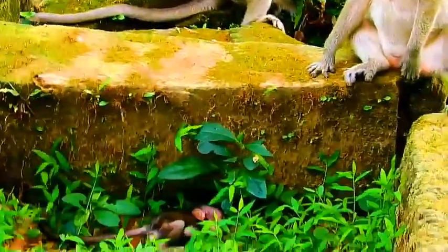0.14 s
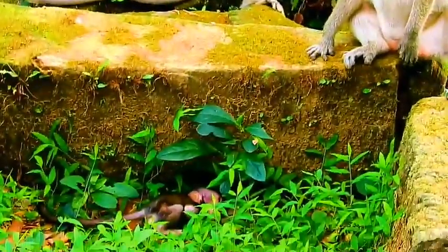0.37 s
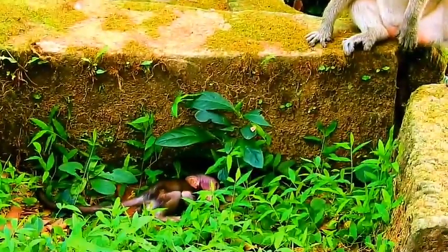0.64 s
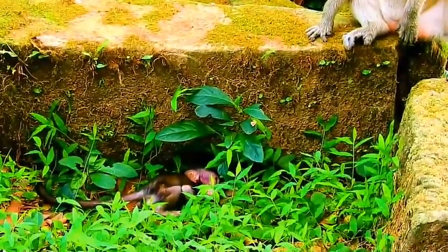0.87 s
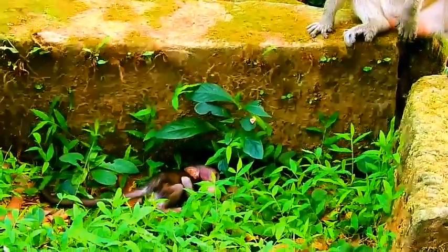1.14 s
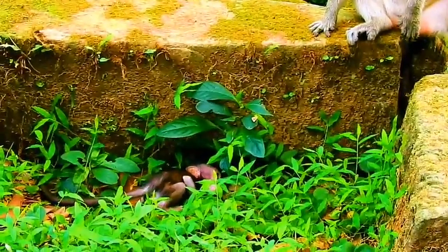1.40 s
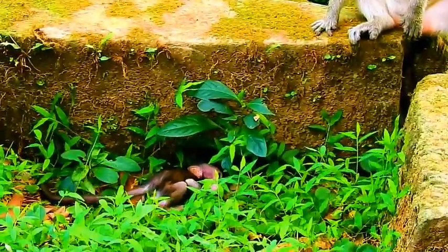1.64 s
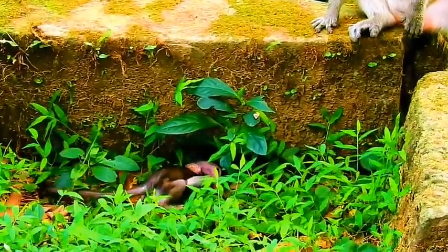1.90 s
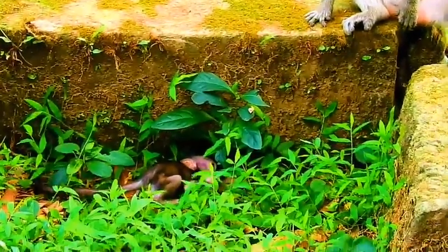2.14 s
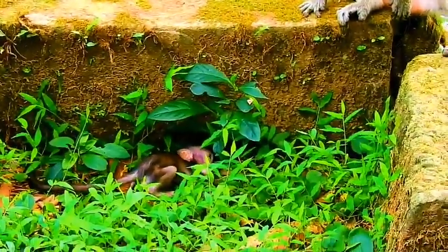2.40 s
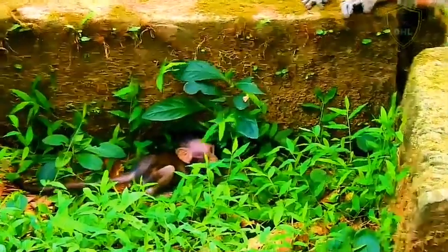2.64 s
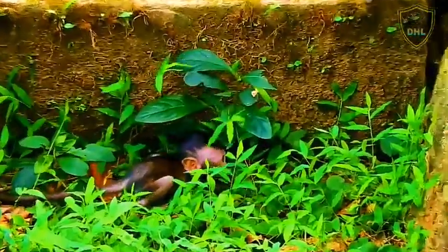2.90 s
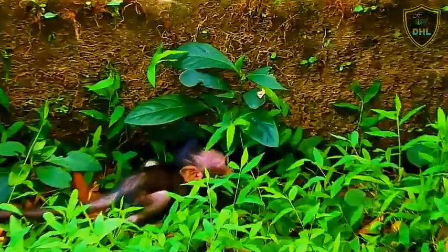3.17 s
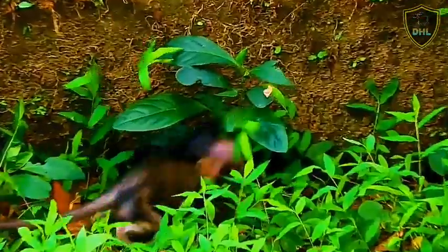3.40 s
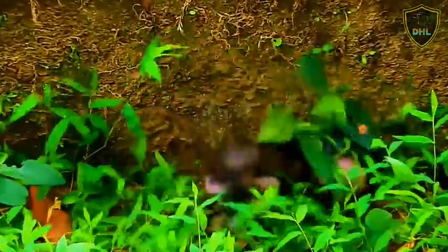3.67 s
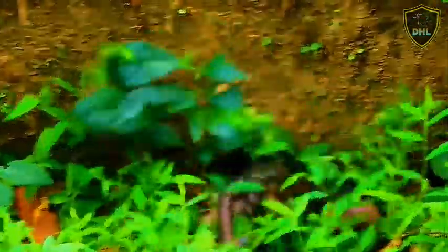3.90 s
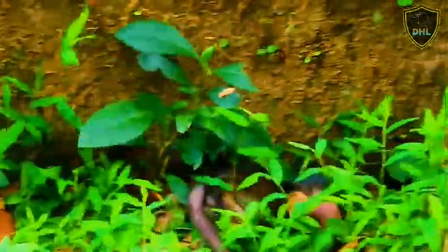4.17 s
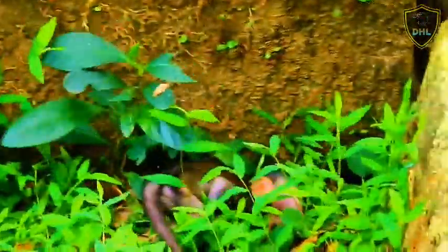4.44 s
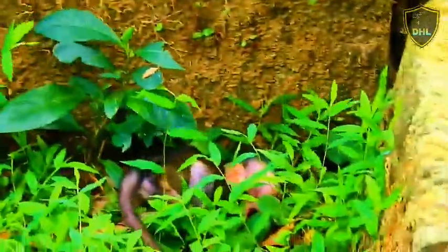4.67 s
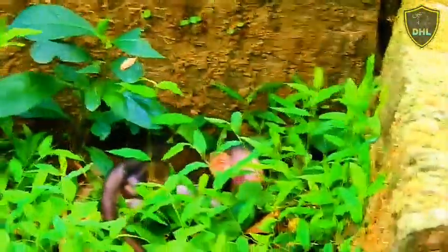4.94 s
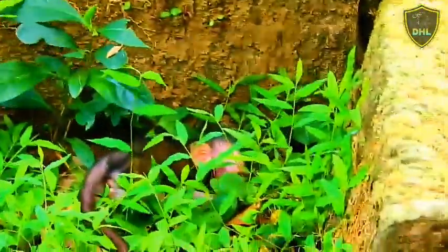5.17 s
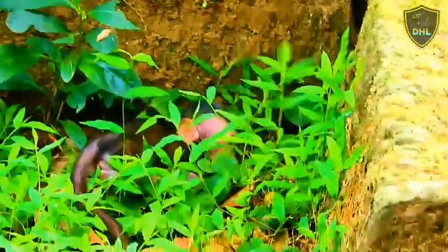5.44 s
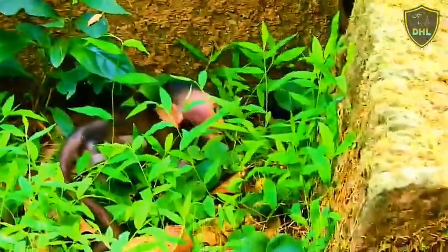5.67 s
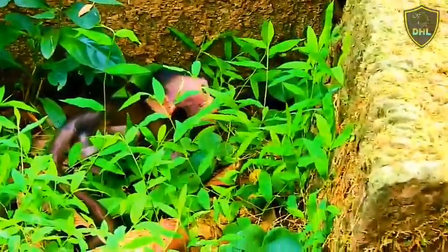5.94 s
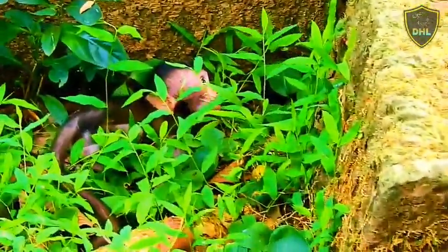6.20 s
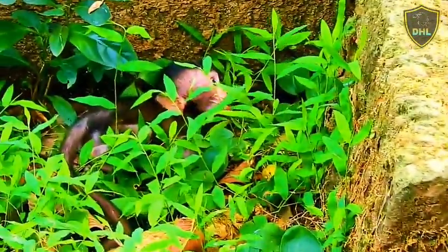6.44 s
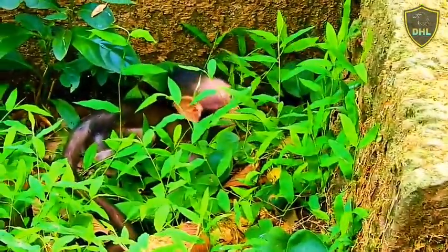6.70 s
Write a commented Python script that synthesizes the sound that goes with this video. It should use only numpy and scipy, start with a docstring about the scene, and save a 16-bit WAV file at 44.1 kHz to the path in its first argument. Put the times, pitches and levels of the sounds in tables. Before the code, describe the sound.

Outdoors in dry leaves and undergrowth, a baby monkey squeals and screams shrilly in short bursts, cooing softly between, amid rustles, snaps and faint insects.

```python
"""A shrill whistling squeal comes first, over rustling leaves: a young monkey is on the ground by a stone wall.
Soft coos, snapping twigs, a scream, more shrieks and short chirps follow; all its calls are sums of gliding sines.
Leaves, insects, low rumble and puffs of wind are coloured noise; far hoots and low grunts are plain tones.
A creaky trill is a run of clicks that ring. Echoes and a tail of dying noise place the calls and snaps outdoors."""
import sys
import numpy as np
from scipy import signal
from scipy.fft import rfft, irfft, next_fast_len
from scipy.io import wavfile
from scipy.ndimage import uniform_filter1d, map_coordinates

SR = 44100
rng = np.random.default_rng(int(sys.argv[2]) if len(sys.argv) > 2 else 0)


def elevation(decibels):
    """Turn decibel levels (scalar or array-like) into linear amplitude ratios."""
    levels = np.asarray(decibels, float)
    return 10 ** (levels / 20)


def inscribe(sig):
    """Save sig as 16-bit PCM at rate SR to the path in sys.argv[1].

    A 1-D sig is mono; a 2-D sig holds one channel per row.
    Samples are clipped to [-1, 1] before scaling.
    """
    pcm = np.round(np.clip(np.atleast_2d(sig).T, -1, 1) * 32767)
    wavfile.write(sys.argv[1], SR, pcm.astype(np.int16))


N = 300762
T = np.arange(N) / SR  # time in seconds

# Stirs in the leaves: t/s, time to fade 20 dB/s, then body, fizz and swish level/dB before the leaves' grain
LEAF_STIRS = [(0, 0.17, -53.5, -46.5, -80), (1.02, 1, -69.5, -72, -81.5), (1.46, 0.36, -65, -61.5, -70),
              (1.52, 0.4, -70, -70, -67), (1.66, 0.13, -59.5, -68, -75), (1.8, .16, -61, -54.5, -52.5),
              (1.87, .3, -65, -60, -66), (1.97, .5, -68, -74, -74), (2.529, .25, -64, -58, -66),
              (2.64, .4, -67, -66, -72), (2.76, 0.24, -63.5, -68, -78), (3.2, 0.66, -63.5, -77.5, -78),
              (3.56, .5, -57.5, -47, -80), (3.81, 0.34, -53.5, -51, -80), (3.97, 0.01, -61, -54, -77.5),
              (5.045, 0.18, -59, -51, -84), (5.12, 0.25, -62.5, -53.5, -84), (5.445, .1, -71, -56, -59),
              (5.49, 0.42, -56.5, -47, -53), (5.65, 0.94, -64, -53.5, -64.5),
              (5.92, 0.14, -69, -55.5, -92.5), (6.26, 0.4, -62, -68, -82), (6.37, 0.33, -59, -79, -77),
              (6.759, 0.6, -79, -59.5, -72)]
# Tone of the leaves' dull body, brighter fizz and high swish: f/Hz, relative density/dB
BODY_TONE = [(150, -89.5), (250, -39.5), (500, -9), (900, 0), (1500, 1.5), (2200, -7), (3500, -33.5),
             (6000, -90)]
FIZZ_TONE = [(1200, -21.5), (2000, 4), (3200, 6), (4000, -12.5), (5500, -18), (8000, -24), (9500, -42),
             (15000, -65)]
SWISH_TONE = [(3500, -20), (4500, -6.5), (7200, 1.5), (8300, -10.5), (9500, -27), (13000, -62)]
# Tone of the insects, the low rumble and the wind: f/Hz, relative density/dB
INSECT_TONE = [(2200, -89.5), (2800, -39), (3300, -5.5), (3600, 1), (3900, -29.5), (5000, -89.5)]
RUMBLE_TONE = [(30, -32.5), (50, -11.5), (70, 0), (110, 1), (170, -6), (230, -14), (400, -17), (650, -35),
               (1200, -88.5)]
WIND_TONE = [(15, -21), (35, -5), (100, -3), (200, -3.5), (400, -20), (900, -63)]
# Puffs of wind: t/s, level/dB, half length/s
WIND_PUFFS = [(1.742, -62.5, 0.0508), (2.665, -51.5, 0.0377), (3.655, -63, 0.027), (6.299, -58.5, .03),
              (6.42, -54, 0.075)]
# Squeals, point by point: t/s, pitch f/Hz, effort before the mouth/dB, octave against the pitch line/dB
SQUEAL_PATHS = [
    [(0.003, 3940, -30, -8), (0.013, 4890, -19, -8), (0.02, 5840, -16, -12), (0.04, 6830, -16.5, -5),
     (0.064, 7990, -14, -15), (0.082, 8560, -16, -15), (0.101, 9560, -11.5, -15),
     (0.118, 10020, -11.5, -15), (0.17, 9680, -14, -15), (0.19, 9330, -8, -15), (0.244, 9170, -5.5, -15),
     (0.262, 7750, -11, -20), (0.28, 5470, -12, -20), (0.289, 5730, -10.5, -14), (0.295, 5360, -16, -5)],
    [(4.51, 6650, -55.5, 0), (4.517, 7400, -46, -5), (4.529, 8100, -38, -15), (4.598, 8960, -38, -15),
     (4.613, 9630, -21.5, -15), (4.664, 8980, -27.5, -15), (4.687, 7580, -10.5, -5),
     (4.694, 6680, -13, -12), (4.699, 6000, -27, -20), (4.705, 4410, -13, -30), (4.713, 3360, -9, -40),
     (4.722, 3275, -20, 3), (4.73, 2980, -26, -10)],
]
# A line at half a squeal's pitch: t/s, f/Hz, level/dB
UNDERTONE_PATHS = [
    [(4.58, 4410, -52.5), (4.615, 4770, -60.5), (4.655, 4650, -81.5)],
]
# Hoarse shrieks: t/s, pitch f/Hz, effort before the mouth/dB, octave against the pitch line/dB
SHRIEK_PATHS = [
    [(0.293, 5362, -23, -10), (0.302, 4740, -7, -10), (0.312, 4475, -16, 4), (0.322, 4174, -13, 0),
     (0.335, 3400, -26, 6), (0.35, 2962, -22.5, -8)],
    [(3.712, 3920, -29.5, -18), (3.726, 3848, -28, -8), (3.745, 3900, -36, -14)],
    [(3.748, 6798, -41, -5), (3.772, 6864, -35, 5), (3.78, 4140, -25, -15.5)],
    [(3.77, 3910, -24, -25), (3.776, 3800, -14.5, -22), (3.786, 3898, -15.5, -25), (3.808, 4736, -14, -22),
     (3.819, 4610, -18, -20), (3.825, 4700, -12, -26), (3.834, 4860, -11, -28), (3.843, 4800, -14, -24),
     (3.853, 4690, -20, -12), (3.873, 5320, -16, -15), (3.881, 6375, -14.5, -15), (3.909, 6470, -17, -12),
     (3.918, 5729, -29, -10)],
    [(3.925, 6000, -28, -9), (3.945, 6640, -19, -15), (3.965, 6466, -34, -12), (3.991, 6660, -23, -21),
     (4.0, 6360, -32, -15)],
    [(3.91, 4520, -22, -14), (3.932, 4566, -15.5, -28), (3.94, 4800, -30, -20), (3.946, 4841, -21.5, -14),
     (3.975, 4204, -39, -10)],
]
# Warbling scream: t/s, pitch f/Hz, effort before the mouth/dB, in-between line against the pitch line/dB
SCREAM_PATHS = [
    [(3.206, 4380, -30, -45.5), (3.21, 4495, -14.5, -46), (3.216, 5013, -11, -50),
     (3.231, 5453, -12.5, -55), (3.26, 4933, -9.5, -50), (3.298, 6098, -13, -45), (3.336, 4551, -8, -35),
     (3.374, 5920, -13, -17), (3.393, 5390, -13, -22), (3.42, 7110, -17, -15), (3.437, 8449, -14.5, -10),
     (3.472, 8234, -12, -4.5), (3.487, 6594, -30, -10)],
]
# How the mouth colours squeals, shrieks and the scream: f/Hz, level/dB
MOUTH_TONE = [(2000, -25), (3300, -14.5), (4500, -3.5), (5500, -2), (6600, 3), (7600, -1.5), (9000, -12.5),
              (10500, -22), (13000, -32), (16000, -50)]
# Bursts of rasp under the loud calls: start t/s, peak t/s, end t/s, peak level/dB
RASP_BURSTS = [(.25, .29, .33, -27), (.27, .325, .365, -21), (3.199, 3.3, 3.45, -43.5),
               (3.38, 3.47, 3.7, -30), (3.7, 3.732, 3.79, -31.5), (3.76, 3.832, 4.02, -24),
               (3.85, 3.964, 4.01, -34.5), (4.671, 4.699, 4.776, -32)]
# Tone of the rasp: f/Hz, relative density/dB
RASP_TONE = [(1000, -60.5), (2500, -29), (4000, -5.5), (6000, 3.5), (8000, -3), (10000, -14.5),
             (13000, -23.5), (15000, -31.5), (15600, -79.5)]
# Coos: t/s, pitch f/Hz, level before the throat/dB, lift of the overtones/dB
COO_PATHS = [
    [(0.86, 1493, -57, -11), (0.898, 1640, -55.5, -12), (0.973, 1850, -51, -12), (1.06, 2000, -51, -7.5),
     (1.108, 2030, -56.5, 0), (1.148, 2140, -46, -4), (1.24, 2175, -47, -3.5), (1.33, 2120, -51.5, -5),
     (1.37, 2019, -59.5, 7.5), (1.41, 2000, -63.5, 4)],
    [(1.67, 1850, -53, -18), (1.781, 1940, -53.5, -5.5), (1.81, 1960, -50, 1), (1.957, 2048, -59, 2),
     (1.985, 2150, -51.5, -2.5), (2.064, 2233, -47, -3), (2.15, 2030, -64, 5)],
    [(2.45, 1598, -56, -5), (2.506, 1798, -50.5, -6), (2.545, 1788, -44, -8), (2.7, 1860, -51.5, -1.5),
     (2.789, 1896, -55.5, 6), (2.813, 2056, -39.5, -0.5), (2.86, 2125, -44, 3), (2.94, 2000, -56.5, 9)],
    [(6.08, 1817, -51.5, -2.5), (6.183, 1914, -54, 5.5), (6.25, 2020, -57.5, 9), (6.35, 2056, -59.5, 12),
     (6.455, 2024, -60.5, 7.5), (6.5, 1908, -59, 0)],
]
# How the throat colours a coo: f/Hz, level/dB
COO_THROAT_TONE = [(1500, 0.5), (2200, 0), (3100, -22), (3700, -6.5), (4100, 1), (5500, -28), (6300, -18),
                   (7400, -22), (8200, 0), (9200, -6), (11000, -5.5), (13000, -21)]
# Six harmonics of a coo at the vocal folds, from the pitch upward: level/dB
COO_HARMONICS = (0, -3, -13, -11.5, -23, -30.5)
# Snaps of twigs and knocks: t/s, level before a 4 dB cut/dB, centre f/Hz, treble against it/dB, time to fade 60 dB/s
TWIG_SNAPS = [(1.027, -24.5, 1844, -51, 0.049), (1.505, -33, 1550, -31, 0.023),
              (1.649, -27.5, 1430, -34, 0.059), (1.674, -32, 1830, -31.5, 0.055),
              (1.792, -24, 1800, -14, 0.04), (1.803, -36, 4000, 8, .03), (1.854, -31, 1970, -14, 0.023),
              (2.522, -29.5, 1778, -28, 0.0287), (2.804, -33.5, 1160, -18.5, 0.044),
              (2.904, -26.5, 2690, 0, 0.056), (2.915, -36.5, 2030, 25, 0.023), (3.56, -34, 2540, 9, 0.103),
              (3.608, -35, 1470, 5.5, 0.046), (3.65, -34, 927, 6, 0.17), (3.814, -25.5, 3280, 1.5, 0.082),
              (5.043, -28.5, 1560, -43.5, 0.062), (5.098, -46, 2852, -34, 0.05),
              (5.122, -32.5, 1610, -41, 0.04), (5.441, -40, 2672, -39, 0.05),
              (5.475, -33.5, 2835, -26.5, 0.045), (5.501, -31.5, 1330, -33.5, 0.11),
              (5.656, -45, 3208, -18.5, 0.034), (6.125, -32, 1850, -13.5, 0.017),
              (6.258, -31.5, 1630, -23, 0.05), (6.273, -20, 995, -35.5, 0.0181),
              (6.45, -35.5, 1407, -31, 0.035)]
# Far hoots and low grunts: start t/s, end t/s, from f/Hz, to f/Hz, starting level/dB
HOOT_GLIDES = [(2.805, 3.55, 980, 960, -64), (3.645, 3.675, 880, 1078, -52), (3.66, 3.715, 500, 850, -46),
               (3.726, 3.75, 860, 1050, -56), (3.78, 3.81, 547, 802, -54), (3.96, 3.985, 916, 845, -59.5),
               (4.01, 4.037, 566, 468, -48), (6.03, 6.451, 1640, 1605, -57),
               (6.448, 6.757, 1425, 1425, -66)]
# Creaky trill: t/s, clicks per second f/Hz, level/dB
TRILL_PATH = [(4.21, 53.7, -74.5), (4.26, 100, -55), (4.308, 150, -44.5), (4.351, 170, -38.5),
              (4.4, 200, -33), (4.413, 217, -41.5)]
# Throat resonances of the trill, for one of three passes: f/Hz, width f/Hz, level/dB
TRILL_RESONANCES = [(1320, 350, -0.5), (1850, 470, 4)]
# Chirps, arcs of pitch: start t/s, top t/s, end t/s, top f/Hz, edge f/Hz, effort before the throat/dB
CHIRP_ARCS = [(5.128, 5.13, 5.166, 3370, 2450, -34), (5.732, 5.77, 5.795, 3236, 2500, -27),
              (5.812, 5.832, 5.859, 3365, 2400, -21), (6.753, 6.787, 6.792, 3454, 2301, -42),
              (6.789, 6.821, 6.84, 3950, 3400, -35)]
# How the throat colours a chirp: f/Hz, level/dB
CHIRP_THROAT_TONE = [(2200, -4), (2900, -1), (3400, -4), (5200, -31), (6000, -15), (6550, 8), (7100, -10),
                     (7900, -8), (8900, 1), (10000, -15), (13000, -30)]
# Echoes round the near monkey, then those for the other sounds: delay t/ms, left and right level/dB
GROUND_ECHOES = [(1.03, -22, -8.5), (1.672, -8, -17), (2.2, -18, -16), (3.6, -17, -17)]
WALL_ECHOES = [(.35, -13.5, -29), (.8, -26.5, -11.5), (1.9, -12, -24), (3.3, -22, -12)]
# How long the echo tail from the trees lasts: f/Hz, time to fade 60 dB/s
TREE_TAIL = [(500, 0.94), (2000, 0.3), (4500, 0.42), (7000, 0.4), (10000, 0.19), (14000, .15)]
# The sound nearly vanishes for a moment: from t/s, to t/s
BRIEF_GAP = (.0205, .0385)


def unit(x):
    """Scale a sound to an rms of 1."""
    return x / np.sqrt(np.mean(x ** 2) + 1e-20)


def along(points, hz):
    """Read a curve of (Hz, value) points on a log frequency axis."""
    f, v = np.transpose(points)
    return np.interp(np.log(hz + 1), np.log(f + 1), v)


def wobble(rate, size):
    """A smooth random curve with rate knots a second."""
    knots = rng.standard_normal(int(size * rate / SR) + 4)
    return map_coordinates(knots, [np.arange(size) * rate / SR])


def filtered(x, response):
    """Multiply the spectrum of x by a response that is a function of frequency."""
    size = next_fast_len(x.shape[-1] + 8192)
    spectrum = rfft(x, size) * response(np.fft.rfftfreq(size, 1 / SR))
    return irfft(spectrum, size)[..., :x.shape[-1]]


def rush(spectrum, side_db, patchy_db):
    """Stereo noise of rms 1, with small patches of time and frequency at random gains."""
    z = signal.stft(rng.standard_normal((2, N)), nperseg=256)[2]
    patches = uniform_filter1d(rng.standard_normal(z.shape[1:]), 4, 0)
    patches = unit(uniform_filter1d(patches, 8, 1))
    pair = signal.istft(z * elevation(patchy_db * patches), nperseg=256)[1][:, :N]
    coloured = filtered(pair, lambda hz: elevation(along(spectrum, hz)))
    mid, side = coloured * elevation([[0], [side_db]])
    return unit(np.array([mid + side, mid - side]))


def voice(calls, partials, jitter, rough, fade, throat=((1, 0),), ease_s=.006, flutter=0):
    """Sum sines that follow each call's pitch, each line as loud as the throat lets it be.

    partials(turns, seconds, columns) lists (turns, dB); rough smears every line; fade is in seconds."""
    out = np.zeros(N + SR)
    for rows in calls:
        s, hz, *columns = np.transpose(rows)
        t = np.arange(s[0], s[-1] + fade, 1 / SR)
        size = len(t)
        glide = uniform_filter1d(np.interp(t, s, hz), size=int(ease_s * SR) + 1, mode="nearest")
        turns = np.cumsum(glide * (1 + jitter * wobble(120, size))) / SR
        edge = np.clip(np.minimum(t - t[0], t[-1] - t) / fade, 0, 1)
        edge = edge * (1 + flutter * wobble(110, size))  # the level flutters at random
        place = out[round(s[0] * SR):][:size]
        for phase, db in partials(turns, t, [np.interp(t, s, c) for c in columns]):
            # uneven folds and breath
            shake = 1 + rough * (wobble(1500, size) + .07 * rng.standard_normal(size))
            line_hz = np.abs(np.gradient(phase)) * SR
            audible = line_hz < 15800
            gain = np.sqrt(2) * edge * audible * shake * elevation(db + along(throat, line_hz))
            place += gain * np.sin(2 * np.pi * phase)
    return out[:N]


def stirred():
    """Gains of body, fizz and swish: every stir rises fast and fades, and its power adds to the rest."""
    attack_s = 0.015
    at_rest = elevation((-80.5, -80, -84))  # body, fizz, swish
    power = at_rest[:, None] ** 2 * np.ones(N)
    for s, fade_s, *db in LEAF_STIRS:
        age = np.clip(T - s + attack_s, 0, None)
        swell = np.clip(age / attack_s, 0, 1) * elevation(-20 * age / fade_s)
        power = power + np.outer(elevation(db) ** 2, swell ** 2)
    return np.sqrt(power)


def leaves():
    """Rustle as three layers of noise, with fast random level changes for a crackly grain."""
    body_gain, fizz_gain, swish_gain = stirred()
    grain_db = 3 * wobble(70, N)
    body_grain_db = 2.5 * wobble(45, N)
    body = body_gain * elevation(5.5 + body_grain_db) * rush(BODY_TONE, side_db=-15.5, patchy_db=3.5)
    fizz = fizz_gain * elevation(grain_db) * rush(FIZZ_TONE, side_db=-7.5, patchy_db=2)
    swish = swish_gain * elevation(.8 * grain_db) * rush(SWISH_TONE, side_db=-0.5, patchy_db=3)
    return body + fizz + swish


def insects():
    """A steady band of high noise that slowly wavers in level."""
    return elevation(-75.5 + 1.5 * wobble(0.8, N)) * rush(INSECT_TONE, side_db=-9, patchy_db=1.5)


def rumble():
    """Low noise that gently swells and sinks."""
    return elevation(-69 + 1.2 * wobble(1.9, N)) * rush(RUMBLE_TONE, side_db=-15, patchy_db=2.5)


def squeals():
    """A whistle and its octave; a second oscillator adds a line above and a weaker one below."""
    second_hz = 4050

    def lines(turns, t, columns):
        effort, octave = columns
        return [(turns, effort), (2 * turns, effort + octave),
                (turns + second_hz * t, effort - 12), (turns - second_hz * t, effort - 48)]

    whistle = voice(SQUEAL_PATHS, lines, jitter=0.0033, rough=.05, fade=0.00083,
                    throat=MOUTH_TONE, ease_s=0.003, flutter=.15)
    undertone = voice(UNDERTONE_PATHS, lambda turns, t, columns: [(turns, columns[0])],
                      jitter=.004, rough=.1, fade=0.0085)
    return whistle + undertone


def rasp():
    """Bursts of patchy noise under the loud calls, each swelling to a peak and sinking again."""
    swell_db = 28  # from the ends up to the peak
    swell = np.zeros(N)
    for start, peak, end, db in RASP_BURSTS:
        levels = [db - swell_db, db, db - swell_db]
        swell += elevation(np.interp(T, [start, peak, end], levels, left=-150, right=-150))
    noise = rush(RASP_TONE, side_db=-41, patchy_db=2.5)[0]
    return swell * elevation(1.4 * wobble(120, N)) * noise


def shrieks():
    """A hoarse, unsteady whistle and its octave, with weak lines a fixed distance above and below."""
    second_hz = 3950

    def lines(turns, t, columns):
        effort, octave = columns
        return [(turns, effort), (2 * turns, effort + octave),
                (turns + second_hz * t, effort - 24), (turns - second_hz * t, effort - 20)]

    return voice(SHRIEK_PATHS, lines, jitter=0.016, rough=0.43, fade=.002,
                 throat=MOUTH_TONE, ease_s=.003, flutter=.25)


def coos():
    """Soft stacks of harmonics; overtones light up as they pass the throat's resonances."""
    def lines(turns, t, columns):
        level, overtones = columns
        return [((k + 1) * turns, level + db + k ** 0.56 * overtones + 2 * wobble(25, len(t)))
                for k, db in enumerate(COO_HARMONICS)]

    return voice(COO_PATHS, lines, jitter=0.0068, rough=0.087, fade=.008,
                 throat=COO_THROAT_TONE, ease_s=0.022)


def snaps():
    """Soft-edged puffs of dying noise, in a band round each snap's centre and in the treble."""
    out = np.zeros(N + SR)
    t = np.arange(SR // 8) / SR

    def band(hz, octaves):
        return lambda f: np.exp(-(np.log2((f + 1) / hz) / octaves) ** 2)

    for s, db, hz, treble_db, t60 in TWIG_SNAPS:
        envelope = elevation(-60 * t / t60) * (1 - np.exp(-t / 0.00033))
        burst = rng.standard_normal((2, len(t))) * envelope
        body = filtered(burst[0], band(hz, octaves=0.66))
        crack = filtered(burst[1], band(6060, octaves=.45))
        snap = body / np.abs(body).max() + elevation(treble_db) * crack / np.abs(crack).max()
        out[round(s * SR):][:len(t)] += elevation(db - 4) * snap
    return out[:N]


def wind():
    """Puffs of low noise under smooth bell-shaped swells."""
    swell = sum(elevation(db) * np.exp(-((T - s) / width) ** 2) for s, db, width in WIND_PUFFS)
    return swell * rush(WIND_TONE, side_db=-16.0, patchy_db=0)


def hoots():
    """Far hoots and low grunts: plain tones that glide and fade, one unsteady sine each."""
    fade_db = 9  # lost from start to end
    calls = [[(start, from_hz, db), (end, to_hz, db - fade_db)]
             for start, end, from_hz, to_hz, db in HOOT_GLIDES]
    return voice(calls, lambda turns, t, columns: [(turns, columns[0])],
                 jitter=0.035, rough=0.2, fade=0.027, flutter=.5)


def screams():
    """Every other cycle differs, which puts lines halfway between the harmonics; one more lies above."""
    second_hz = 4050

    def lines(turns, t, columns):
        effort, doubling = columns
        return [(turns, effort), (2 * turns, effort - 11),
                (3 * turns / 2, effort + doubling), (turns / 2, effort + doubling - 18),
                (turns + second_hz * t, effort - 22.5)]

    return voice(SCREAM_PATHS, lines, jitter=.004, rough=0.084, fade=0.0011,
                 throat=MOUTH_TONE, ease_s=0.01, flutter=.35)


def modes(table):
    """The response of a row of resonances, each one flipped in sign against the last."""
    def response(f):
        return sum((-1) ** k * elevation(db) * 1j * f * width / (hz * hz - f * f + 1j * f * width)
                   for k, (hz, width, db) in enumerate(table))
    return response


def trill():
    """Clicks of uneven strength that speed up and ring two throat resonances."""
    s, rate, db = np.transpose(TRILL_PATH)
    turns = np.cumsum(np.interp(T, s, rate, left=0, right=0)) / SR
    clicks = np.diff(np.floor(turns), prepend=0)  # one click per whole turn
    throat = modes(TRILL_RESONANCES)
    ring = filtered(clicks * elevation(2.6 * rng.standard_normal(N)), lambda f: throat(f) ** 3)
    sounding = (T > s[0]) & (T < s[-1])
    return elevation(np.interp(T, s, db)) * ring / np.sqrt(np.mean(ring[sounding] ** 2))


def chirps():
    """Short arcs of four harmonics; less effort dulls them."""
    harmonics_db = (-3, -2, -8, -18)  # at the loudest effort
    edge_db = 10  # softer at both ends
    dulling = .45  # extra dB lost per dB of effort less, growing as the square up the overtones
    u = np.linspace(-1, 1, num=13)  # from start to end, 0 at the top
    loudest = max(row[-1] for row in CHIRP_ARCS)
    arcs = []
    for start, top, end, top_hz, edge_hz, db in CHIRP_ARCS:
        times = np.interp(u, [-1, 0, 1], [start, top, end])
        pitch = top_hz - (top_hz - edge_hz) * u ** 2
        arcs.append(np.transpose([times, pitch, db - edge_db * u ** 4]))

    def lines(turns, t, columns):
        effort = columns[0]
        return [((k + 1) * turns, effort + db + k * k * dulling * (effort - loudest))
                for k, db in enumerate(harmonics_db)]

    return voice(arcs, lines, jitter=.003, rough=0.066, fade=0.0019,
                 throat=CHIRP_THROAT_TONE, ease_s=.002, flutter=.2)


def space(x, tail_db, walls=WALL_ECHOES):
    """Direct sound, early echoes off stone and ground, and a tail of dying noise from the trees.

    Fast random level changes blur the tail."""
    hz, t, z = signal.stft(rng.standard_normal((2, SR // 2)), SR, nperseg=256)
    decay = elevation(-60 * t / along(TREE_TAIL, hz)[:, None])
    tail = signal.istft(z * decay, SR, nperseg=256)[1]
    rise = np.clip(np.arange(tail.shape[1]) / SR / 0.014, 0, 1)
    tail *= elevation(tail_db) / np.linalg.norm(tail[0]) * rise

    def early(f):
        return 1 + sum(elevation([[left_db], [right_db]]) * np.exp(-2j * np.pi * f * ms / 1000)
                       for ms, left_db, right_db in walls)

    blurred = x * (.25 + unit(wobble(800, N)))
    return filtered(x, early) + signal.fftconvolve(blurred[None], tail, axes=1)[:, :N]


def scene():
    """The near monkey, the softer callers, the snaps and the background."""
    def mouth(hz):  # no bass from the small mouth, nothing at the very top
        return (hz < 15500) / (1 + (1900 / (hz + 1)) ** 6)

    background = leaves() + insects() + rumble() + wind()
    loud_calls = filtered(squeals() + rasp() + shrieks() + screams(), mouth)
    near = space(loud_calls, tail_db=-11.5, walls=GROUND_ECHOES)
    near = near + space(chirps(), tail_db=-13, walls=GROUND_ECHOES)
    softer = space(coos() + hoots(), tail_db=-11.5) + space(trill(), tail_db=-14)
    return near + softer + space(snaps(), tail_db=-7) + background


def roll_off(x):
    """The treble ends steeply here."""
    return signal.sosfilt(signal.butter(12, 16390, fs=SR, output="sos"), x)


def record(dry):
    """The level drops almost to nothing for a moment near the start, with very short ramps."""
    ramp_s = .0004
    outside_s = np.abs(T - np.mean(BRIEF_GAP)) - np.ptp(BRIEF_GAP) / 2
    kept = np.clip(outside_s, 0, ramp_s) / ramp_s
    mix = dry * (.003 + kept)
    return roll_off(mix)


dry = scene()
out = record(dry)
inscribe(out)
```